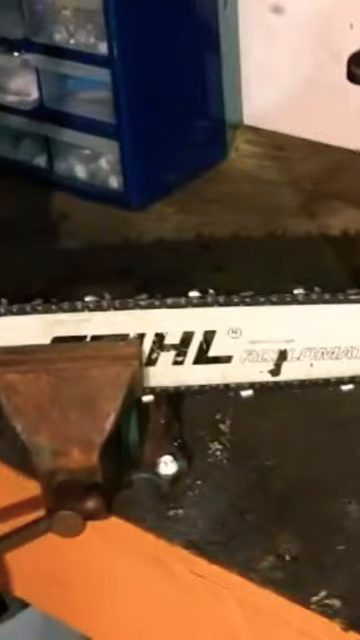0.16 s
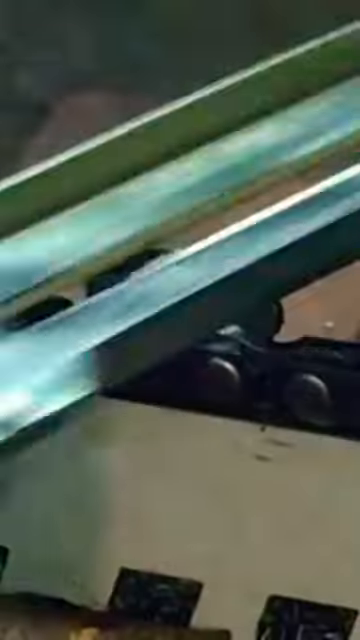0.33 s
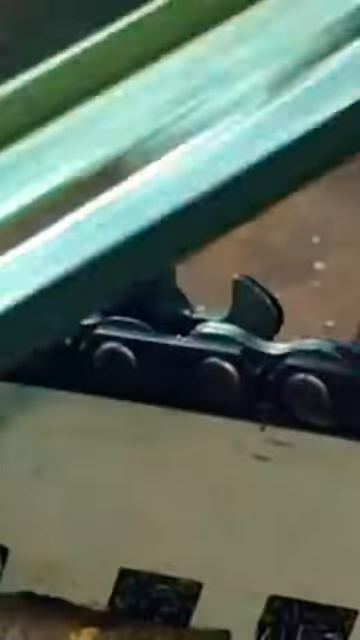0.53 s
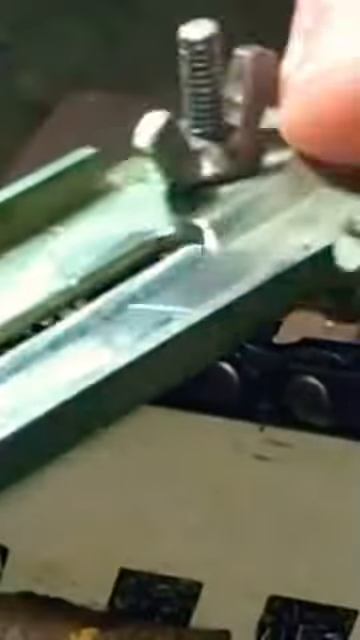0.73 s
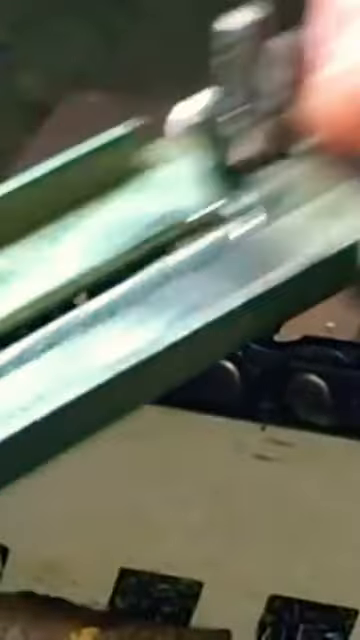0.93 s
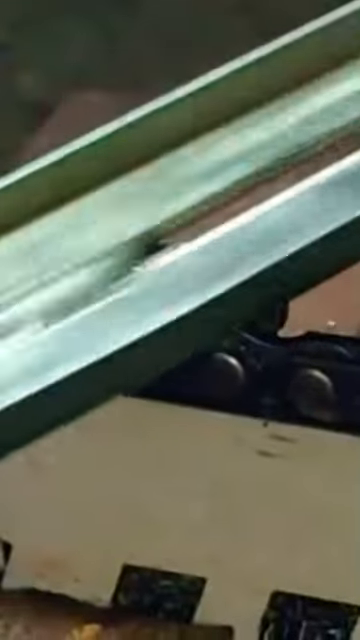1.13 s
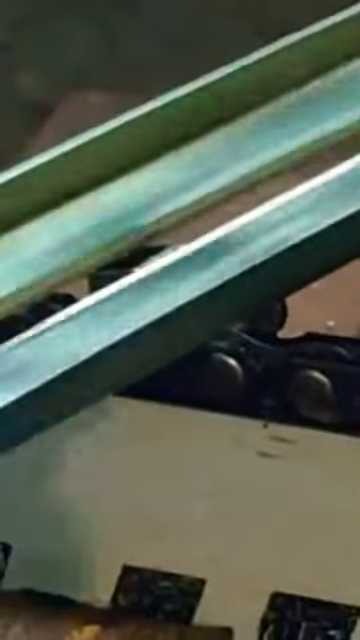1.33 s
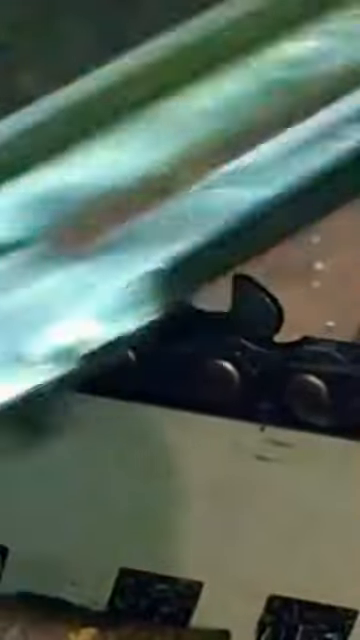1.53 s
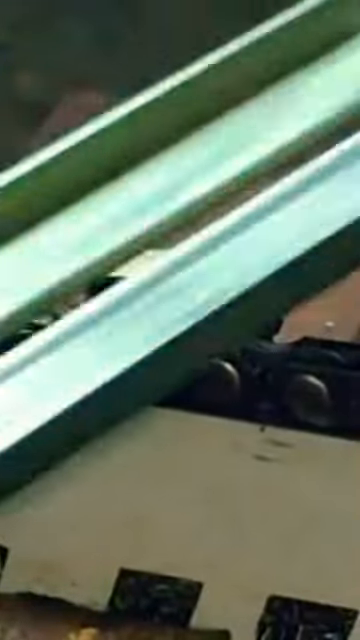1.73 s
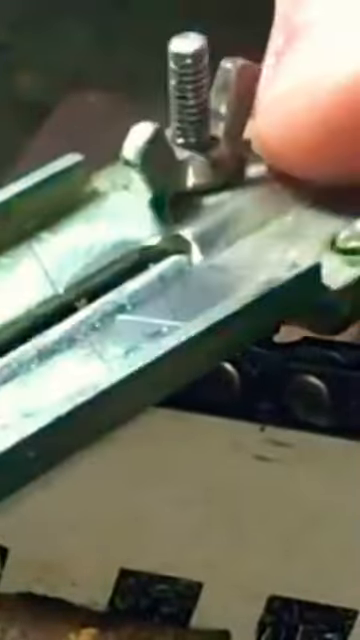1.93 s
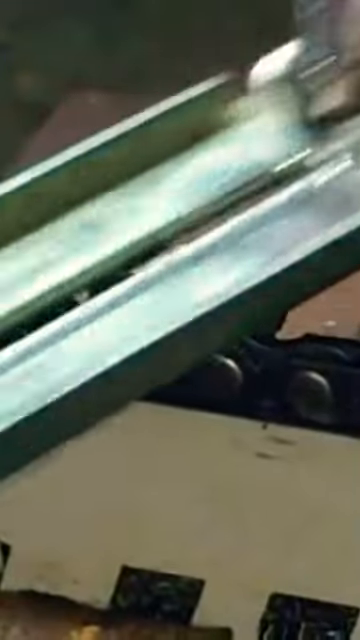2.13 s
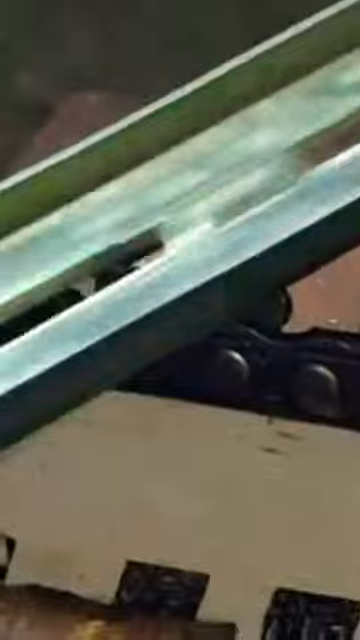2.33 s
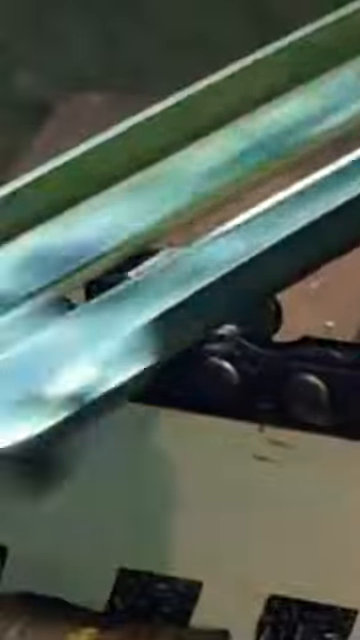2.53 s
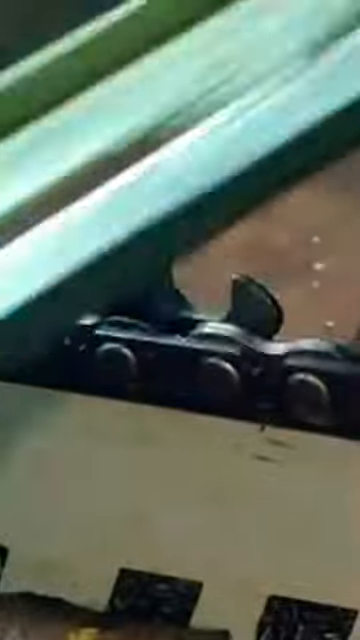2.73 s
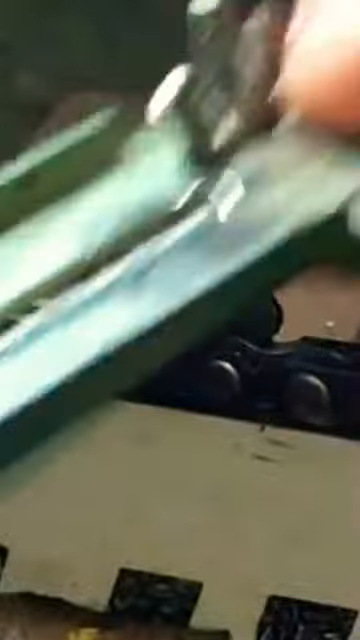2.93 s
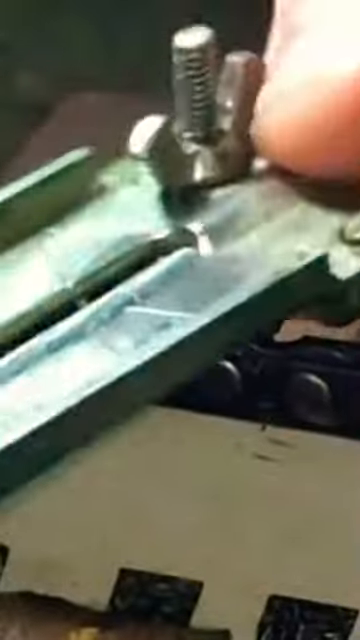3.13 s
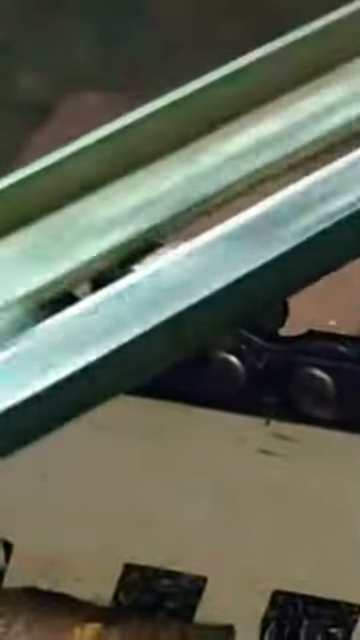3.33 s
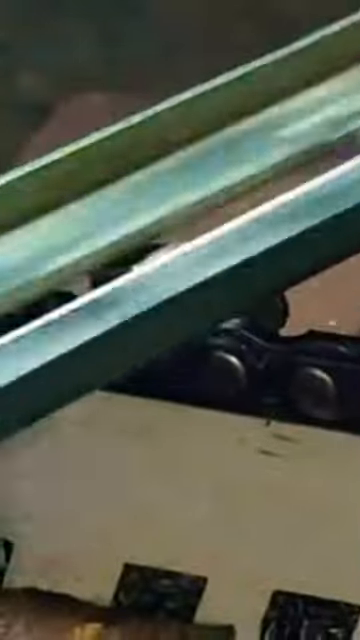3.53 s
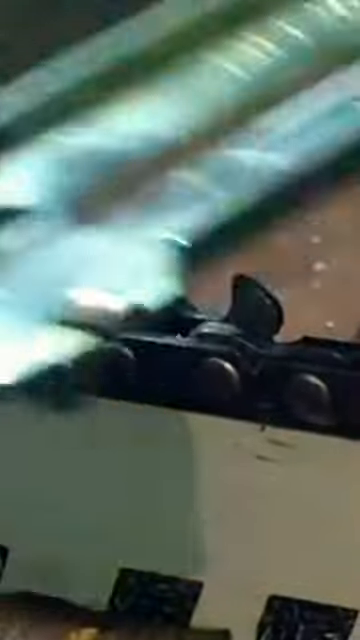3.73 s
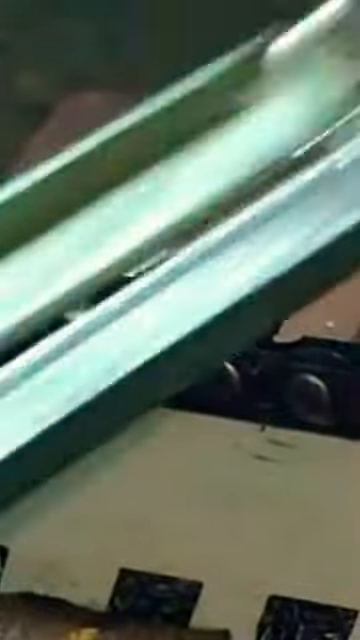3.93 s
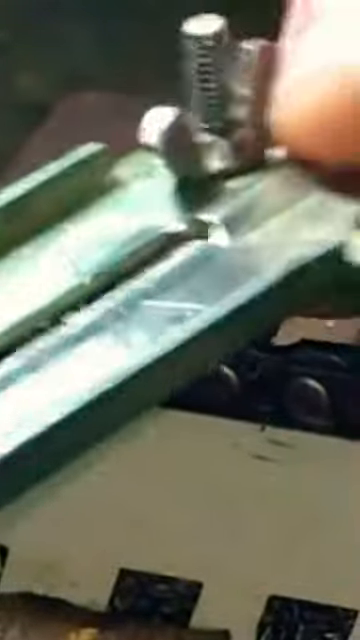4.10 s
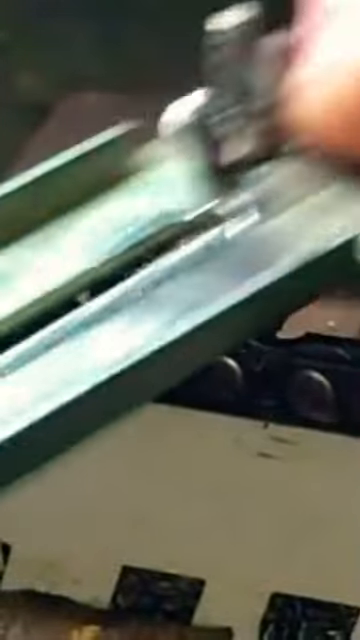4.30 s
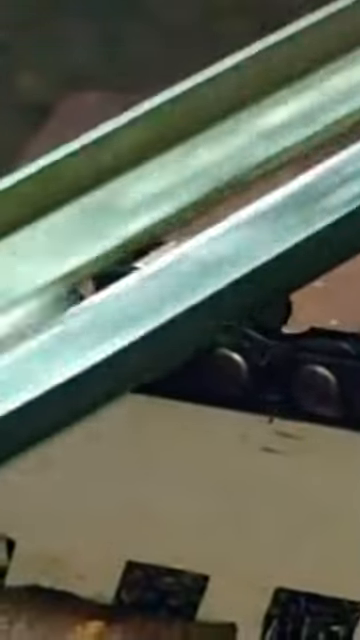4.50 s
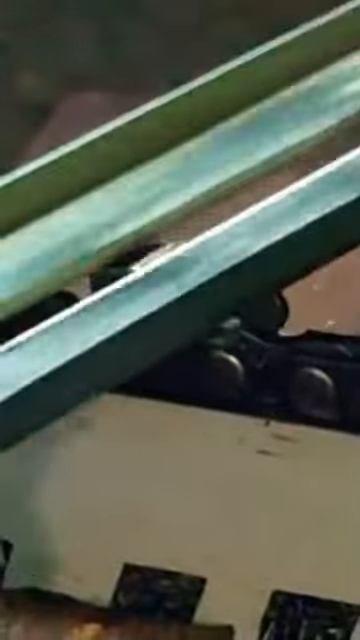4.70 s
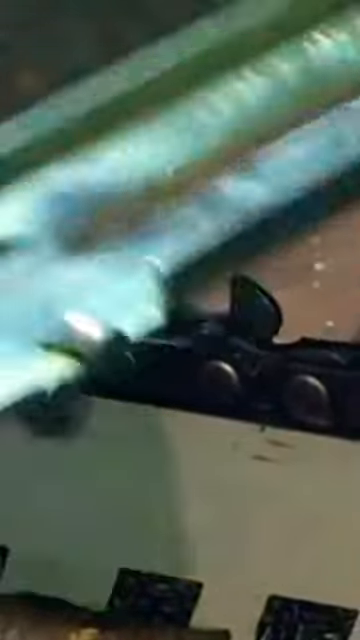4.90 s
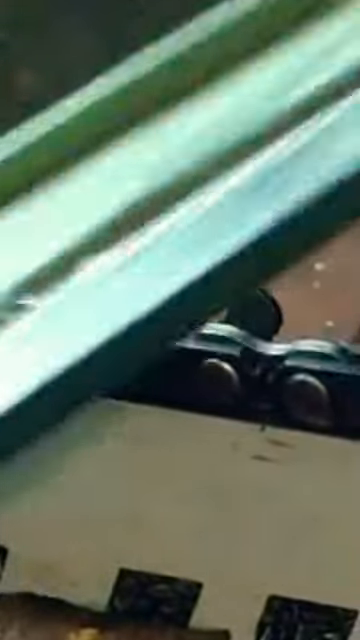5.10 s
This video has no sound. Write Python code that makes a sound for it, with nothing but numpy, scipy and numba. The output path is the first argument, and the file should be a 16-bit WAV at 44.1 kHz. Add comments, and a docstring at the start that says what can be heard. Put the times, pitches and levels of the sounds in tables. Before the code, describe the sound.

Close, gritty filing of a clamped saw chain: four full metallic rasping pushes, separated by short pauses with light steel clinks.

```python
"""Filing a saw chain

A round file in a guide sharpens a saw chain clamped in a vise, close to a phone in a small workshop.
On each push a train of tooth bites and chip noise drives the sliding modes of the file and the fixed modes
of chain and bar, while noise through low modes makes the bench rumble. Between pushes the file is lifted,
drawn back with a soft hiss and set down with steel clinks: noise bursts and decaying sines.
A short opening scene of duller, quieter air cuts to the filing, with fuller air and a wavering hum.
"""
import sys
import numpy as np
from scipy import signal
from scipy.fft import rfft, irfft, next_fast_len
from scipy.io import wavfile
from scipy.ndimage import uniform_filter1d
from numba import njit

SR = 44100
rng = np.random.default_rng(int(sys.argv[2]) if len(sys.argv) > 2 else 0)


def log_audio(samples):
    """Write samples as a 16-bit WAV file to the path given in sys.argv[1]."""
    # one column per channel
    frames = np.atleast_2d(samples).T
    # limit to full scale, then quantise
    limited = np.clip(frames, -1, 1)
    pcm = np.round(limited * 32767).astype(np.int16)
    wavfile.write(sys.argv[1], SR, pcm)


N = 231853

# Pushes of the file, the first heard only from near its end, where the filing scene cuts in:
# (start [s], end [s], rasp level [dB], bench rumble level [dB], fine hiss level [dB], attack [s])
PUSHES = [(0.327, 0.448, -35.5, -37, -47, 0.0011), (1.067, 1.535, -35, -37.5, -44.5, 0.04),
          (2.187, 2.669, -35, -38.5, -44, 0.062), (3.276, 3.75, -36, -38.5, -44, 0.048),
          (4.402, 4.93, -36, -37, -45, 0.04)]
# Bending modes of the file, moving with the contact point:
# (frequency at tip [Hz], frequency at handle [Hz], width [Hz], level at tip [dB], level at handle [dB])
FILE_MODES = [(345, 1374, 64, 2.5, -10.5), (1840, 5200, 300, -4.5, -1), (5560, 4450, 290, -12, -3),
              (4000, 7760, 570, -13, -12)]
# Broad colour of the rasp: (frequency [Hz], density [dB per Hz])
RASP_COLOUR = [(150, -44), (300, 2.5), (560, -3.5), (830, -5.5), (1400, -0.5), (1950, -1.5), (2450, -0.5),
               (2950, -3.5), (4100, -1.5), (5000, -2.5), (6200, -1.5), (10000, -7), (15500, -6),
               (16500, -48)]
# Resonances of chain, bar and guide: (frequency [Hz], width [Hz], level over the broad colour [dB])
STEEL_MODES = [(423, 49, 1), (529, 7.8, 8.5), (710, 31.5, 13), (997, 108, 9), (1290, 19, 3.5),
               (1465, 21, 10), (1610, 28, 6), (1690, 55, 7), (2146, 13, 13.5), (2420, 234, 9),
               (2685, 24, 13.5), (3250, 50, 2.5), (3500, 36, 9.5), (3753, 105, 6), (3930, 24, 6),
               (4146, 37, 8), (4475, 115, 4), (5750, 49, 9.5), (6060, 150, 3), (6580, 430, 2),
               (8230, 90, 3), (8840, 220, 3.5), (9600, 160, 6), (11500, 210, 3.5), (12400, 94, 3),
               (14920, 213, -7)]
# Modes of vise and bench: (frequency [Hz], width [Hz], level [dB])
BENCH_MODES = [(50, 32, -5.5), (71, 13, -1), (106.2, 16.4, -2), (124.4, 53, -7.5), (174.8, 25.3, -2.5),
               (198, 26.5, -0.5), (221.8, 27.7, -6), (253.2, 17.8, -6), (269.6, 5.7, 0.5)]
# Ring of file and cutter after a knock: (frequency [Hz], mean level [dB], t60 [s])
CLINK_MODES = [(2510, -8, 0.09), (4720, -34, 0.08), (6490, 4, 0.055), (7790, -4, 0.042), (8140, -25, 0.053),
               (9000, -9, 0.087), (9720, -43, 0.056), (12670, -3, 0.062), (13000, -4, 0.035),
               (14300, 0, 0.06), (15800, 3, 0.033)]
# Square knocks of the file on the cutter, the first as the filing scene cuts in, the rest set-downs:
# (time [s], clack level [dB], bright level [dB], thud level of the vise [dB])
SET_DOWNS = [(0.3263, -38, -53, -32.5), (0.861, -39.5, -45, -42.5), (0.9747, -36, -37.5, -37.5),
             (2.031, -40, -39, -39), (3.122, -46.5, -46, -40.5), (4.133, -39, -43.5, -42),
             (4.263, -40.5, -37, -37.5), (4.281, -40.5, -43.5, -35)]
# The guide reaches its stop at the end of a full push: (time [s], level [dB])
STOPS = [(1.534, -32.5), (2.662, -29), (3.742, -38)]
# Glancing touches of file and guide on the chain:
# (time [s], level [dB], treble relative to that level [dB], t60 [s])
SCUFFS = [(0.209, -58.5, -26, 0.033), (0.947, -40, -6, 0.066), (1.602, -42.5, -13, 0.036),
          (3.261, -49.5, -20, 0.078), (4.147, -39.5, -10, 0.06), (4.16, -37.5, -10, 0.055),
          (4.256, -38.5, -10, 0.031), (4.305, -42, -3.5, 0.028), (4.389, -45, -17, 0.048),
          (4.977, -46, -7, 0.052)]
# Low swells near 50 Hz, most after the file lets go, one faint and long:
# (time [s], level [dB], frequency [Hz], t60 [s])
LOW_SWELLS = [(0.451, -32.5, 52.8, 0.31), (0.663, -54, 47.8, 3.8), (3.75, -49, 52, 0.47),
              (4.949, -40.5, 56.16, 0.88)]
# The guide slides lightly on the chain as it is drawn back: (middle [s], half length [s], level [dB])
RETURNS = [(0.532, 0.07, -58.5), (0.693, 0.083, -67), (1.98, 0.092, -70.5), (3.0, 0.13, -71.5),
           (5.047, 0.07, -70)]
# Wavering hum: (frequency [Hz], mean level [dB])
HUM = [(59, -65.5), (108, -70.5), (178, -70.5)]
# Workshop air during the filing: (frequency [Hz], density [dB per Hz])
AIR_COLOUR = [(28, -35), (42, 5), (55, -1.5), (80, -9.5), (140, -17), (300, -18), (900, -28.5),
              (1200, -28.5), (1800, -30), (2450, -28.5), (3300, -34), (5000, -35.5), (16000, -45)]
# Duller, quieter air of the opening scene: (frequency [Hz], density [dB per Hz])
OPENING_AIR_COLOUR = [(18, -38), (30, -8), (55, 4), (245, -11), (355, -6), (600, -17), (1160, -10.5),
                      (1670, -20), (2830, -23), (3580, -22.5), (16000, -39)]

TIME = np.arange(N) / SR
PADDED = next_fast_len(N + SR)
FREQS = np.maximum(np.fft.rfftfreq(PADDED, 1 / SR), 1)

# Contact point at the start and end of a push (0 at the tip, 1 at the handle)
FULL_TRAVEL, FIRST_TRAVEL = (0.03, 0.97), (0.62, 0.72)
# The first push has more low flex and less chain ring
FIRST_FLEX_DB, FIRST_CHAIN_DB = 16, -7.5
# The file takes hold from this far below its full level
TAKE_HOLD_DB = -12.5
# Each push is an arch: share of the push at its peak, and its sag one whole push away
RASP_PEAK, RASP_SAG_DB = 0.43, -12
RUMBLE_PEAK, RUMBLE_SAG_DB = 0.52, -27.5
HISS_PEAK, HISS_SAG_DB = 0.44, -20
# Near mid-push the file judders, with less rasp and more rumble (place and width as shares of the push)
JUDDER_AT, JUDDER_WIDTH, JUDDER_RASP_DB, JUDDER_RUMBLE_DB = 0.498, 0.058, -3.5, 2.5
# The cut stops quickly, a light graze lingers and the bench settles
RELEASE_T60_S, GRAZE_DB, GRAZE_T60_S, SETTLE_T60_S = 0.098, -14, 0.45, 0.31
# The hand rocks the file, so its modes waver by this share (rms)
MODE_WAVER = 0.025
SLIDE_HZ, SLIDE_WIDTH_HZ, SLIDE_HISS_DB = 2430, 340, -18.5  # hiss relative to the ring
SCENE_CUT_S, OPENING_DB, AIR_DB = 0.326, -68, -61.5
TOP_HZ = 16100


def undb(db):
    """Level in decibels to amplitude ratio."""
    return 10 ** (np.asarray(db) / 20)


def unit(x):
    """Normalization to rms 1."""
    return x / np.sqrt(np.mean(x ** 2))


def shape(x, response):
    """Linear filtering: multiply the spectrum by a frequency response."""
    return irfft(rfft(x, PADDED) * response, PADDED)[:N]


def colour(points):
    """Magnitude response interpolated through (frequency [Hz], level [dB]) on a log-frequency axis."""
    hz, db = np.transpose(points)
    return undb(np.interp(np.log(FREQS), np.log(hz), db))


def resonance(hz, width):
    """Response of one damped mode, gain 1 at its centre."""
    return 1 / (1 + 1j * (FREQS / hz - hz / FREQS) * hz / width)


def band(x, lo_hz, hi_hz, order=3):
    """Causal band-pass filtering."""
    edges = [lo_hz, min(hi_hz, SR / 2 - 100)]
    return signal.sosfilt(signal.butter(order, edges, "band", fs=SR, output="sos"), x)


def walk(rate):
    """Slow random fluctuation: levels held 1 / rate s, smoothed into slopes, with rms near 1."""
    hold = max(int(SR / rate), 2)
    steps = np.repeat(rng.standard_normal(N // hold + 1), hold)
    return unit(uniform_filter1d(steps, hold)[:N])


def fade(t, t60):
    """Exponential decay by 60 dB in t60 seconds."""
    return np.exp(-np.log(1000) * t / t60)


def add(track, s, sound):
    """Superposition of a sound starting at time s."""
    i = int(s * SR)
    track[i:i + len(sound)] += sound[:N - i]


def file_travel():
    """Moving excitation point: position along the file, with its flex and chain ring levels (dB)."""
    times = [time for push in PUSHES for time in push[:2]]
    places = [*FIRST_TRAVEL] + [*FULL_TRAVEL] * (len(PUSHES) - 1)
    position = np.interp(TIME, times, places)
    first = np.interp(TIME, times[1:3], [1, 0])
    return position, FIRST_FLEX_DB * first, FIRST_CHAIN_DB * first


def push_gains(rumble_hold=0.43):
    """Envelopes of rasp, rumble and hiss: each push takes hold, arches and decays after release."""
    rasp_gain, rumble_gain, hiss_gain = np.zeros((3, N))
    for start, end, rasp_level, rumble_level, hiss_level, attack in PUSHES:
        share = np.clip((TIME - start) / (end - start), 0, 1)
        after = np.maximum(TIME - end, 0)
        hold_db = TAKE_HOLD_DB * np.exp(np.minimum((start - TIME) / attack, 10))
        judder = np.exp(-((share - JUDDER_AT) / JUDDER_WIDTH) ** 2)
        release = np.maximum(fade(after, RELEASE_T60_S), undb(GRAZE_DB) * fade(after, GRAZE_T60_S))

        rasp_arch = RASP_SAG_DB * (share - RASP_PEAK) ** 2 + JUDDER_RASP_DB * judder
        rumble_arch = RUMBLE_SAG_DB * (share - RUMBLE_PEAK) ** 2 + JUDDER_RUMBLE_DB * judder
        hiss_arch = HISS_SAG_DB * (share - HISS_PEAK) ** 2
        rasp_gain += release * undb(rasp_level + hold_db + rasp_arch)
        rumble_gain += fade(after, SETTLE_T60_S) * undb(rumble_level + rumble_hold * hold_db + rumble_arch)
        hiss_gain += release * undb(hiss_level + hold_db + hiss_arch)
    return rasp_gain, rumble_gain, hiss_gain


def cutting_force(position, tooth_hz=750, jitter=.12, tooth_db=3, chip_db=0.5, teeth_db=-4, chatter_db=0.5):
    """Impulsive excitation: teeth bite one by one, fastest at mid-file, amid the noise of tiny chips."""
    speed = .5 + .5 * np.sin(np.pi * position)
    teeth_passed = np.cumsum(tooth_hz * speed * np.exp(jitter * walk(300))) / SR
    bites = np.diff(np.floor(teeth_passed), prepend=0) * undb(tooth_db * rng.uniform(-2.2, 2.6, N))
    chips = rng.standard_normal(N) * undb(chip_db * np.minimum(rng.exponential(size=N), 2))
    force = undb(teeth_db) * unit(bites - bites.mean()) + unit(chips)
    return unit(force) * undb(chatter_db * walk(110))


def band_flicker(force, flicker_db=2.5, flicker_rate=26, count=56):
    """Amplitude modulation by band: random slow level changes, separate in each pitch range of the rasp."""
    spectrum, out = rfft(force, PADDED), np.zeros(N)
    # overlapping triangular bands, wider toward the treble
    place = (count - 1) * np.sqrt(np.linspace(0, 1, len(spectrum)))
    for k in range(count):
        part = irfft(spectrum * np.maximum(1 - abs(place - k), 0), PADDED)[:N]
        out += part * undb(flicker_db * walk(flicker_rate * rng.uniform(.7, 1.3)))
    return unit(out)


def along_steel(x, spread_s=0.004):
    """Dispersion: bending waves carry treble faster than bass and smear each bite (delay at 1 kHz)."""
    return shape(x, np.exp(-4j * np.pi * spread_s * np.sqrt(1000 * FREQS)))


@njit
def sliding_mode(x, hz, width):
    """Driven oscillator of moving centre: displacement in step with the force below it, opposed above."""
    y, velocity_state, place_state = np.empty(len(x)), 0., 0.
    for i in range(len(x)):
        g, damping = np.tan(np.pi * hz[i] / SR), width / hz[i]
        v = (velocity_state + g * (x[i] - place_state)) / (1 + g * (g + damping))
        y[i] = damping * (place_state + g * v)
        velocity_state = 2 * v - velocity_state
        place_state += 2 * g * v
    return y


def rasp(force, position, flex_db, ring_db, rasp_gain, hiss_gain, swell_db=1.0):
    """Forced vibration: the cutting force excites the sliding modes of the file and fixed modes of the chain."""
    sound = force
    for k, (tip_hz, handle_hz, width, tip_db, handle_db) in enumerate(FILE_MODES):
        hz = (tip_hz + (handle_hz - tip_hz) * position) * np.exp(MODE_WAVER * walk(14))
        db = tip_db + (handle_db - tip_db) * position + swell_db * walk(14)
        db = db + flex_db * (k == 0)  # flexing strengthens the first listed mode only
        sound = sound + undb(db) * sliding_mode(force, hz, float(width))
    sound = shape(sound, colour(RASP_COLOUR))

    steel_power = sum(abs(undb(db) * resonance(hz, width)) ** 2 for hz, width, db in STEEL_MODES)
    sound = sound + undb(ring_db) * shape(sound, np.sqrt(1 + steel_power) - 1)
    # the finest chips hiss with a strength of their own
    hiss = shape(sound, 1 / (1 + (7000 / FREQS) ** 8))
    return rasp_gain * unit(sound - hiss) + hiss_gain * unit(hiss)


def bench(gain):
    """Modal response to random force: the uneven drag of the file shakes vise and bench."""
    modes = 0
    for k, (hz, width, db) in enumerate(BENCH_MODES):
        modes = modes + (-1) ** k * undb(db) * resonance(hz, width)
    return gain * unit(band(shape(rng.standard_normal(N), modes), 42, 400))


def knock(clack_db, bright_db, thud_db, t60, rise_s, crack_db, ring_db=-4, crack_t60=0.0051,
          thud_t60=0.22, thud_rise_s=0.0049, body_db=-6, body_t60=0.12):
    """Impact of steel on steel: crack, short rattle and ringing modes, then bar body and the duller vise thud."""
    t = TIME[:SR // 3]
    noise = rng.standard_normal((4, len(t)))
    chance = rng.standard_normal((len(CLINK_MODES), 2))
    rattle = fade(t, max(t60, .01)) + undb(crack_db) * fade(t, crack_t60)
    clack = undb(clack_db) * unit(band(noise[0], 770, 4200, order=2))
    bright = undb(bright_db) * unit(band(noise[1], 4700, 13200, order=2))

    ring = np.zeros(len(t))
    for (hz, db, decay), (level, phase) in zip(CLINK_MODES, chance):
        ring += undb(db + 2 * level) * np.sin(2 * np.pi * hz * t + np.pi * phase) * fade(t, decay)

    vise = unit(band(noise[2], 101, 277, order=2)) * fade(t, thud_t60)
    bar = undb(body_db) * unit(band(noise[3], 330, 830, order=2)) * fade(t, body_t60)
    thud = undb(thud_db) * (vise + bar) * (1 - np.exp(-t / thud_rise_s))
    sound = rattle * (clack + bright) + undb(bright_db + ring_db) * ring + thud
    return sound * (1 - np.exp(-t / rise_s))


def knocks(stop_bright_db=-6, stop_thud_db=-15, scuff_thud_db=-6):
    """Contact duration: set-downs load the vise, stops click sharply, glancing touches swell more slowly."""
    out = np.zeros(N)
    for s, db, bright_db, thud_db in SET_DOWNS:
        add(out, s, knock(db, bright_db, thud_db, t60=0.064, rise_s=0.00028, crack_db=-5.5))
    for s, db in STOPS:
        click = knock(db, db + stop_bright_db, db + stop_thud_db, t60=0.047, rise_s=0.00046, crack_db=1.5)
        add(out, s, click)
    for s, db, treble_db, t60 in SCUFFS:
        add(out, s, knock(db, db + treble_db, db + scuff_thud_db, t60, rise_s=0.0025, crack_db=-1))
    return out


def low_swells(rise_s=0.014):
    """Damped vibration: sines near 50 Hz rise softly and decay, most of them after the file lets go."""
    out, t = np.zeros(N), TIME[:SR]
    for s, db, hz, t60 in LOW_SWELLS:
        swell = undb(db) * np.sin(2 * np.pi * hz * t) * fade(t, t60)
        add(out, s, swell * (1 - np.exp(-t / rise_s)))
    return out


def draw_back():
    """Light sliding friction: the returning guide rubs the chain, a soft hiss with one ringing band."""
    pressure = sum(undb(db) * np.exp(-((TIME - s) / half) ** 2) for s, half, db in RETURNS)
    response = resonance(SLIDE_HZ, SLIDE_WIDTH_HZ) + undb(SLIDE_HISS_DB)
    return pressure * unit(shape(rng.standard_normal(N), response))


def squeak(s=1.875, hz=4600, length_s=.018, db=-71):
    """Phase-modulated tone in a bell-shaped envelope: a faint chirp as the guide is drawn back."""
    envelope = undb(db) * np.exp(-((TIME - s) / length_s) ** 2)
    return envelope * np.sin(2 * np.pi * hz * TIME + np.sin(2 * np.pi * 35 * TIME))


def room(x, t60=0.27, wet_db=-19):
    """Reverberation: convolution with a short, dull decaying noise tail from the cluttered workshop."""
    tail = band(rng.standard_normal(N), 120, 6000, order=1) * fade(TIME, t60) * (TIME > .006)
    return x + undb(wet_db) * signal.fftconvolve(x, tail / np.linalg.norm(tail))[:N]


def workshop(waver_db=2):
    """Shaped noise and tones: duller, quieter air of an opening scene, then a cut to fuller air with hum."""
    opening = unit(shape(rng.standard_normal(N), colour(OPENING_AIR_COLOUR))) * undb(OPENING_DB)
    air = unit(shape(rng.standard_normal(N), colour(AIR_COLOUR))) * undb(AIR_DB + 0.54 * walk(3.89))
    hum = np.zeros(N)
    for hz, db in HUM:
        level = undb(db + waver_db * walk(2.88)) * np.sqrt(2)  # rms to peak
        hum += level * np.sin(2 * np.pi * hz * TIME + 0.78 * walk(4.01))
    return np.where(TIME < SCENE_CUT_S, opening, air + hum)


def scene():
    """Superposition of all tool sounds in the room, over the workshop air, the same in both channels."""
    rasp_gain, rumble_gain, hiss_gain = push_gains()
    position, flex_db, ring_db = file_travel()
    force = along_steel(band_flicker(cutting_force(position)))
    filing = rasp(force, position, flex_db, ring_db, rasp_gain, hiss_gain)
    tools = filing + bench(rumble_gain) + knocks() + low_swells() + squeak() + draw_back()
    mono = room(tools) + workshop()
    return np.array([mono, mono])


def record(dry):
    """Band limiting: the phone cuts the top steeply with an elliptic low-pass."""
    return signal.sosfilt(signal.ellip(10, .2, 70, TOP_HZ, fs=SR, output="sos"), dry)


dry = scene()
out = record(dry)
log_audio(out)
```